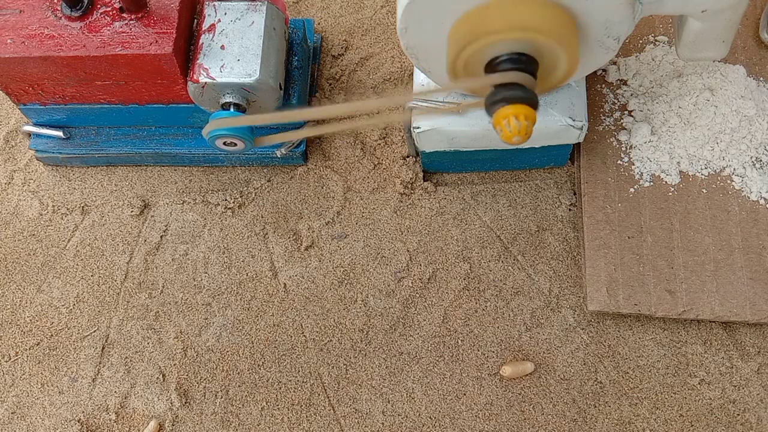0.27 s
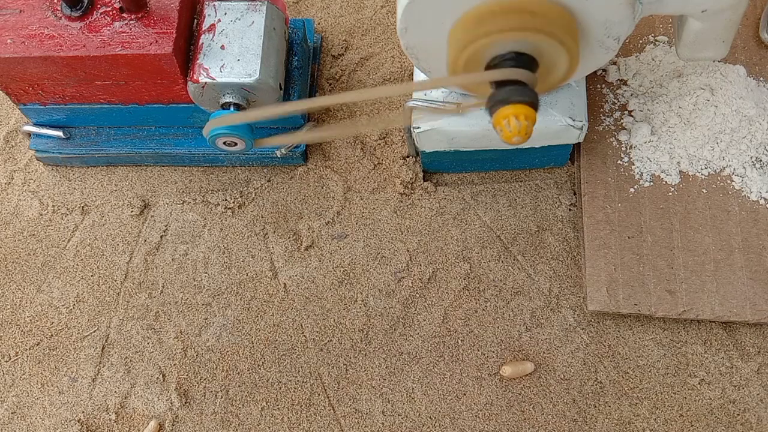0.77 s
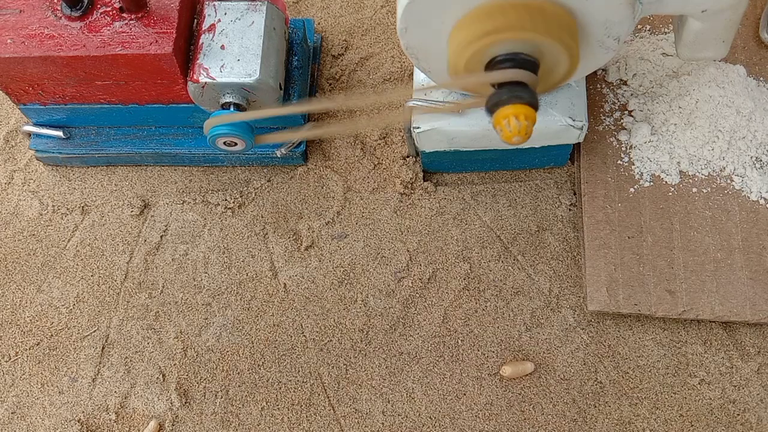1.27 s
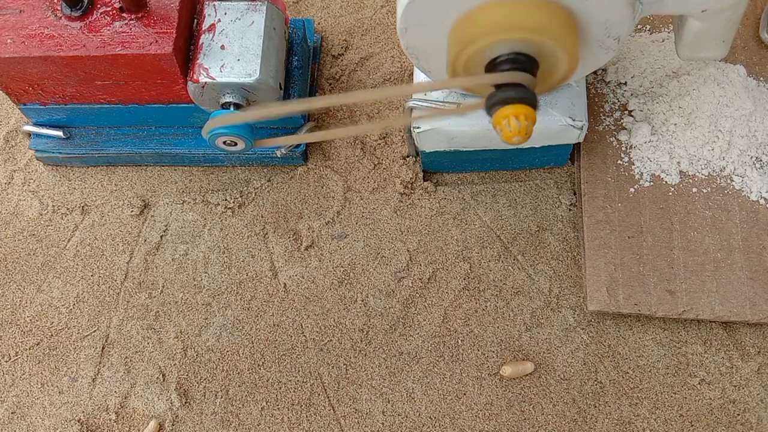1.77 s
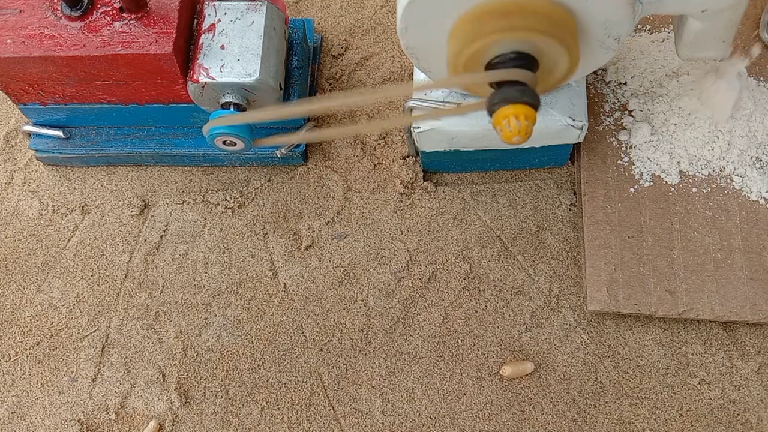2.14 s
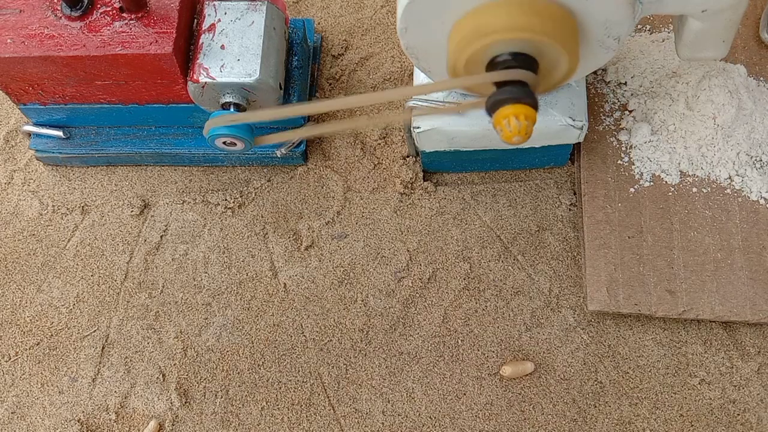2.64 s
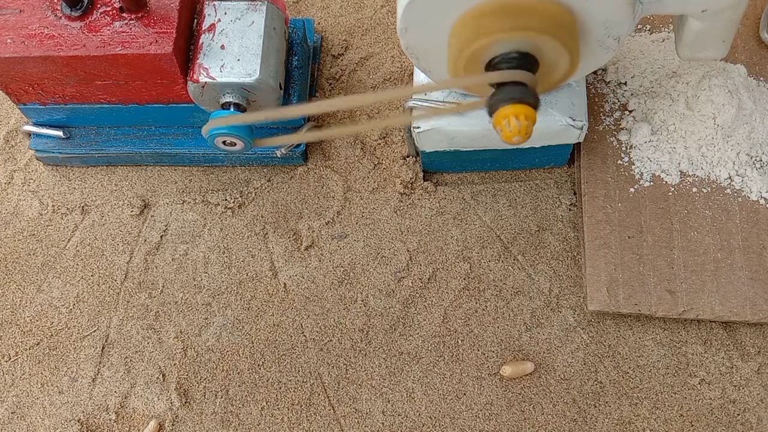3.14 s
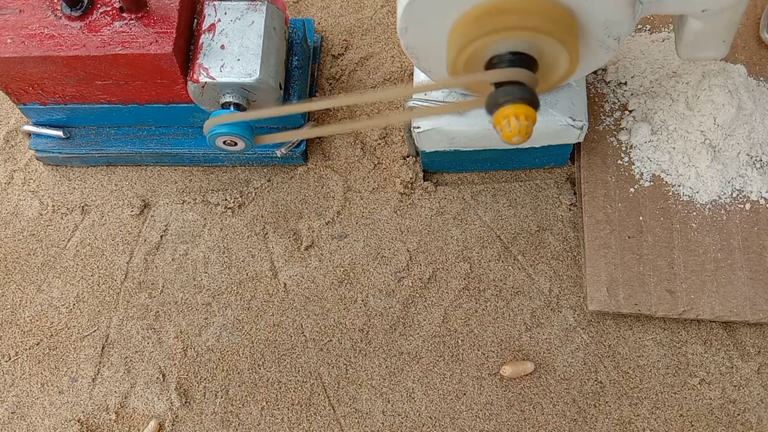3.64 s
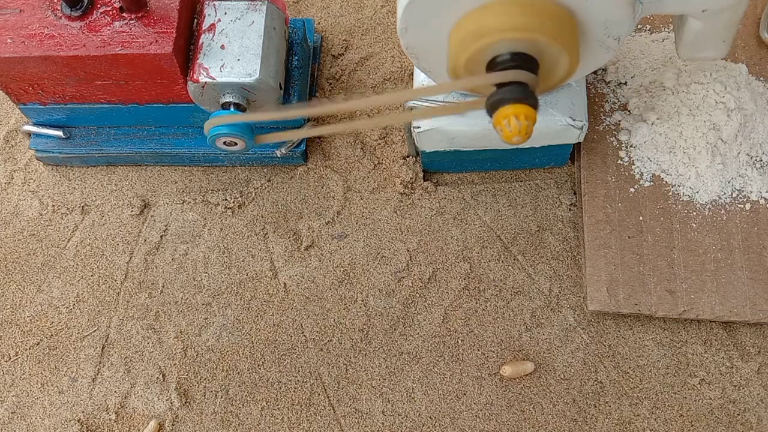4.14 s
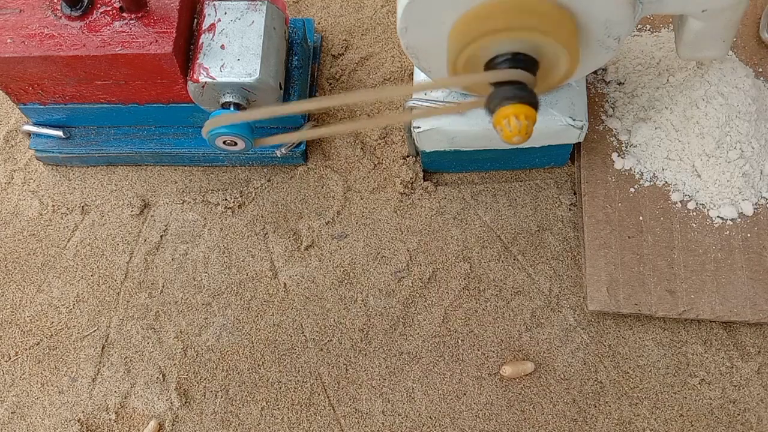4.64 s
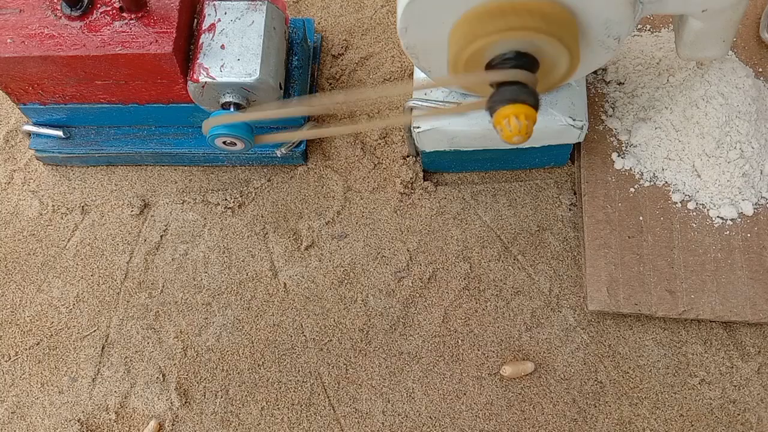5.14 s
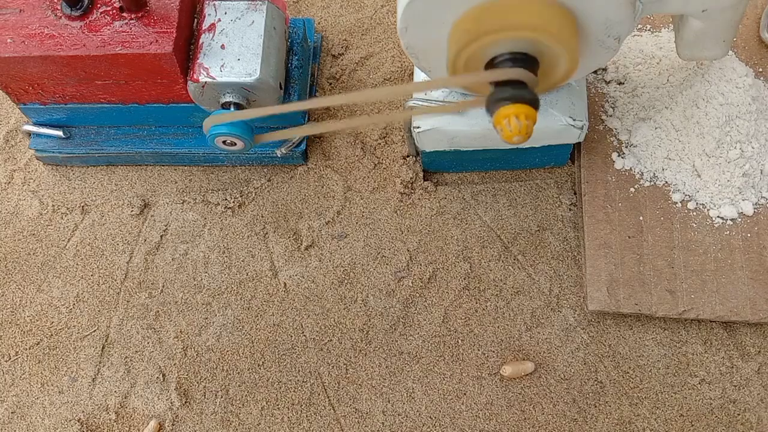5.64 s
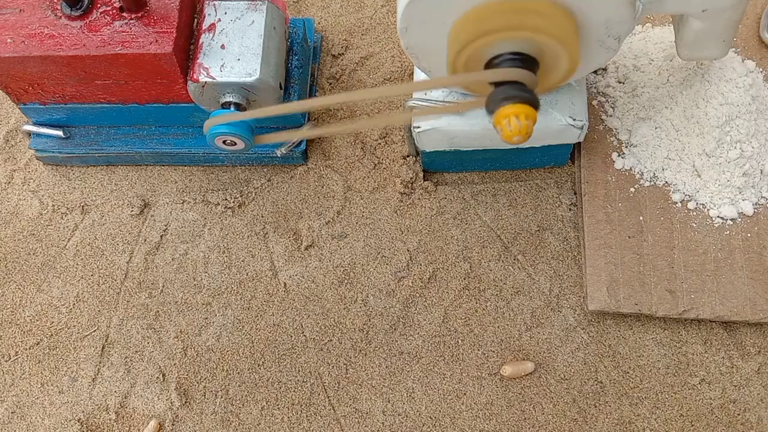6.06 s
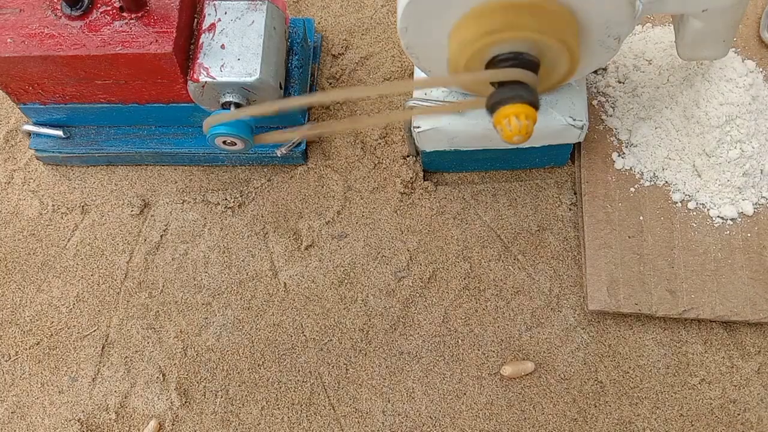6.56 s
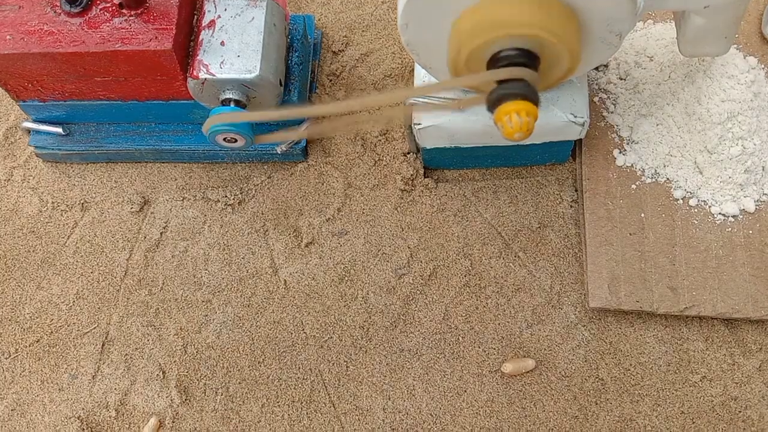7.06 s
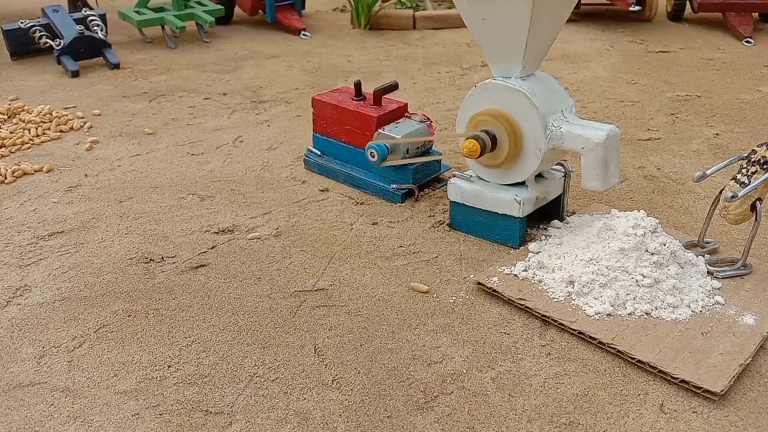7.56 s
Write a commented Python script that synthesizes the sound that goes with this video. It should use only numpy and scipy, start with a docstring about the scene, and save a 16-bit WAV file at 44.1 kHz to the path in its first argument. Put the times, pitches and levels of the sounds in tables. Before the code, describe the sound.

Knocking and rattling, a one-cylinder diesel engine at a miniature mill speeds up in three repeated surges, each ending in hissing exhaust barks.

```python
"""The looped sound of a single-cylinder diesel engine climbs evenly from 6 to 12.5 firings a second,
then coasts as the fuel is cut back. Each firing is an impulse that excites the block's modes; a fifth
of a cycle later the cylinder blows down through the resonant exhaust with a bark and a hiss, over
rattling metal. The same surge comes round again and again, each time with two faint hoots, and a
limiter holds the peaks."""
import sys
import numpy as np
from scipy import signal
from scipy.fft import rfft, irfft
from scipy.io import wavfile
from scipy.ndimage import uniform_filter1d, minimum_filter1d

SR = 44100
rng = np.random.default_rng(int(sys.argv[2]) if len(sys.argv) > 2 else 0)


def transcribe(u):
    """Save the signal u as a 16-bit wav file named by the first command-line argument.

    u: samples, shape (n,) or (channels, n), limited to [-1, 1]; the rate is SR.
    q: integer samples, one column per channel.
    """
    v = np.clip(np.atleast_2d(u).T, -1, 1)
    q = np.round(v * 32767).astype(np.int16)
    wavfile.write(sys.argv[1], SR, q)


N = 343980
SURGE_FROM_S, SURGE_TO_S = 2.655, 5.349
T = np.arange(int(SURGE_TO_S * SR)) / SR
FIRST_FIRING_S, START_HZ, CLIMB_HZ_PER_S, GOVERNED_HZ = 2.671, 6.0324, 3.11, 12.528

# spectral envelope common to the engine's noises: frequency_hz, relative_db
ENGINE_SPECTRUM = [(40, -36.5), (160, -32.5), (220, -19), (470, -18), (760, -15.5), (960, -4), (2200, -1),
                   (3300, -2.5), (3700, -13.5), (4800, -3.5), (7000, -13), (8000, -28), (9800, -45.5),
                   (11300, -40), (13500, -61)]
# strength of the exhaust barks through the surge: time_s, relative_db
BARK_STRENGTH = [(2.7, -12), (3.3, -2.5), (4.05, -7), (4.7, -5), (5.12, 8), (5.26, -18.5)]


def undb(db):
    """Decibels to amplitude ratio."""
    return 10 ** (np.asarray(db) / 20)


def unit(x):
    """Normalisation to rms 1."""
    return x / np.sqrt(np.mean(x ** 2))


def curve(table, t):
    """Linear interpolation in a two-column table."""
    return np.interp(t, *np.array(table).T)


def add(out, start_s, sound):
    """Superposition: mix a sound in at its start time."""
    i = int(round(start_s * SR))
    first, last = max(i, 0), min(i + len(sound), len(out))
    out[first:last] += sound[first - i:last - i]


def white():
    """Gaussian noise with a flat spectrum."""
    return rng.standard_normal(len(T))


def band(x, hz, width_hz):
    """Second-order resonance, gain 1 at its centre."""
    return signal.lfilter(*signal.iirpeak(hz, hz / width_hz, fs=SR), x)


def colour(x, *spectra, size=2048):
    """Minimum-phase filter of unit power; spectra in cascade add in decibels."""
    log_hz = np.log(np.maximum(np.arange(size // 2 + 1) * SR / size, 1))
    db = sum(np.interp(log_hz, np.log(p[:, 0]), p[:, 1]) for p in map(np.array, spectra))
    cepstrum = irfft(np.log(undb(db)))
    cepstrum[1:size // 2] *= 2  # folding the cepstrum makes the response causal
    cepstrum[size // 2 + 1:] = 0
    response = irfft(np.exp(rfft(cepstrum)))
    return signal.fftconvolve(x, response / np.linalg.norm(response))[:len(x)]


def firing_hz(t):
    """Uniform acceleration: the firing rate climbs until the governor holds it."""
    return np.minimum(START_HZ + CLIMB_HZ_PER_S * (t - FIRST_FIRING_S), GOVERNED_HZ)


def cycles():
    """Phase as the integral of rate: engine cycles since the first firing."""
    turned = np.cumsum(firing_hz(np.maximum(T, SURGE_FROM_S))) / SR
    return turned - np.interp(FIRST_FIRING_S, T, turned)


def cycle_times(phase):
    """Phase locking: the times at which each cycle reaches the given share of its length."""
    turned = cycles()
    return np.interp(np.arange(phase, turned[-1]), turned, T)


def fuel(t):
    """Energy supply, from shut (0) to full (1): opened, eased as speed rises, then cut back."""
    # fuel setting: time_s, share_of_full
    setting = [(2.66, 0.94), (2.82, 1), (3.98, 0.92), (4.3, 0.92), (4.65, 0.86), (4.85, 0.34), (5.3, 0.02)]
    return np.clip(curve(setting, t), 0, 1)


def engine_db(t, start_db, db_per_hz, shut_db):
    """Level law: linear in decibels with the rise in firing rate and the share of fuel shut off."""
    return start_db + db_per_hz * (firing_hz(t) - START_HZ) + shut_db * (1 - fuel(t))


def rumble(level_db=-74, hz=55, width_hz=45):
    """Narrow-band noise makes a very faint, low background."""
    return undb(level_db) * unit(band(band(white(), hz, width_hz), hz, width_hz))


def hoots(level_db=-38.5, fade_db_per_s=-20):
    """Two faint, nearly pure tones bend a little in pitch and decay exponentially."""
    # soft hoots: start_s, length_s, first_hz, middle_hz, last_hz
    notes = [(4.96, .26, 337, 348, 343), (5.428, .072, 372, 347, 340)]
    out = np.zeros(N)
    for start_s, length_s, *pitch_hz in notes:
        progress = np.linspace(0, 1, int(length_s * SR))
        hz = np.interp(progress, [0, .5, 1], pitch_hz)
        tone = np.sin(2 * np.pi * np.cumsum(hz) / SR)
        tapered = unit(signal.windows.tukey(len(tone), .2) * tone)
        add(out, start_s, tapered * undb(fade_db_per_s * length_s * progress))
    return undb(level_db) * out


def exhaust_pipe(x):
    """Air-column resonance: the pipe reinforces noise near its own modes."""
    # pipe resonances: centre_hz, width_hz, gain_db
    modes = [(490, 38, -2.5), (588, 70, 9), (810, 51, -14), (1050, 17, -11), (2220, 45, -12),
             (3045, 25, -26.5), (3170, 52, -18), (4420, 170, -12.5), (4430, 57, -24)]
    return x + sum(undb(db) * band(x, hz, width_hz) for hz, width_hz, db in modes)


def rattle(width_hz, spread_db, rush_db, modes=140, hits=260):
    """Random impact excitation: metal modes, each struck at its own moments, over a rush of gas."""
    metal = np.zeros(len(T))
    for hz in np.linspace(800, 15000, modes) + rng.uniform(-40, 40, modes):
        strikes = np.zeros(len(T))
        forces = undb(spread_db * np.clip(rng.standard_normal(hits), -2, 2))
        strikes[rng.integers(0, len(T), hits)] = forces
        metal += band(strikes, hz, width_hz)
    return unit(unit(metal) + undb(rush_db) * white())


def rattle_and_hiss(valve_phase, split_hz=3750, metal_depth=.28, gas_depth=0.93):
    """Amplitude modulation: metal and gas noise peak on the exhaust stroke, dip on the power stroke."""
    # level swing from the valve's opening, before scaling by each depth: cycle_share, swing_db
    stroke = [(0, -6.5), (.1, 7.5), (.2, 5.5), (.4, 4), (.5, -3.5), (.76, 1.5), (.86, 4.5), (1, -14)]
    stroke_db = curve(stroke, (cycles() - valve_phase) % 1)
    stroke_db = uniform_filter1d(stroke_db, size=90)  # the swing is eased over about 2 ms, so the level has no sudden step as each cycle wraps round
    noise = exhaust_pipe(colour(rattle(width_hz=41, spread_db=5.0, rush_db=0.0), ENGINE_SPECTRUM))
    metal = signal.sosfilt(signal.butter(4, split_hz, "low", fs=SR, output="sos"), noise)
    gas = signal.sosfilt(signal.butter(4, split_hz, "high", fs=SR, output="sos"), noise)
    metal_db = engine_db(T, start_db=-24.5, db_per_hz=0.92, shut_db=-4) + metal_depth * stroke_db
    gas_db = engine_db(T, start_db=-35.5, db_per_hz=2.05, shut_db=-16) + gas_depth * stroke_db
    return unit(metal) * undb(metal_db) + unit(gas) * undb(gas_db)


def gulps(valve_phase, delay_s=0.032, half_width_s=0.012, pipe_hz=540, width_hz=200, follow=0.34):
    """Pipe resonance: gas swings back with a hollow note, most after strong barks with the fuel cut."""
    swell = np.zeros(len(T))
    for open_s in cycle_times(valve_phase):
        strength = undb(follow * curve(BARK_STRENGTH, open_s))
        swell += strength * np.exp(-((T - open_s - delay_s) / half_width_s) ** 2)
    hollow = band(band(white(), pipe_hz, width_hz), pipe_hz, width_hz)
    return unit(hollow) * swell * undb(engine_db(T, start_db=-54, db_per_hz=2.1, shut_db=9.8))


def thumps(pitch_hz=95, decay_s=0.0038, size=3000):
    """Heavily damped oscillation: each firing shoves the engine, and unburnt fuel pops in the pipe."""
    # exhaust pops as the fuel is cut: start_s, level_db
    pops = [(4.754, -41), (4.905, -33), (4.987, -33)]
    t = T[:size]
    swing = np.sin(2 * np.pi * pitch_hz * t) * np.exp(-t / decay_s)
    firings = [(s, engine_db(s, start_db=-35, db_per_hz=-0.98, shut_db=-60)) for s in cycle_times(0)]
    out = np.zeros(len(T))
    for start_s, level_db in firings + list(pops):
        add(out, start_s, undb(level_db) * swing / swing.max())
    return out


def barks(valve_phase, rise_s=0.00092, close_s=0.0039, empty_s=0.14, full_s=.018, shut_s=0.0037,
          bark_db=-6, flutter_db=3, scatter_db=0.8, clink_db=-16, clink_hz=4320, size=4000):
    """Blowdown: the valve opens and cylinder pressure escapes in a burst that shakes the silencer."""
    # barks that stand out or ring brightly: near_s, extra_level_db, extra_ring_db
    accents = [(3.011, -1, 7.5), (3.275, 0.5, 9), (3.518, 6, 7), (4.754, 3, 3), (4.987, -7, 16)]
    t = T[:size]
    flow, ringing = np.zeros((2, len(T)))
    opens_s = cycle_times(valve_phase)
    levels_db = curve(BARK_STRENGTH, opens_s) + scatter_db * rng.standard_normal(len(opens_s))
    rings_db = np.zeros(len(opens_s))
    for near_s, extra_db, ring_db in accents:
        nearest = np.argmin(np.abs(opens_s - near_s))
        levels_db[nearest] += extra_db
        rings_db[nearest] = ring_db
    attack = 1 - np.exp(-(t / rise_s) ** 2)
    for open_s, level_db, ring_db in zip(opens_s, levels_db, rings_db):
        length_s = shut_s + (full_s - shut_s) * fuel(open_s)  # less fuel, shorter burst
        closing = np.exp(-np.maximum(t - length_s, 0) / close_s)
        puff = undb(level_db) * attack * closing * np.exp(-t / empty_s)
        add(flow, open_s, puff)
        add(ringing, open_s, undb(ring_db) * puff)
    flutter = undb(flutter_db * unit(band(white(), hz=218, width_hz=175)))
    burst = flow * unit(flutter) * rattle(width_hz=23, spread_db=4.0, rush_db=-1.5)
    # the bark's tilt on the engine spectrum: frequency_hz, relative_db
    tilt = [(150, -6.5), (1100, 2), (2800, 2), (7000, -4.5), (9000, 3), (15000, -2.5)]
    exhaust = exhaust_pipe(colour(burst, ENGINE_SPECTRUM, tilt))
    valve_clink = undb(clink_db) * ringing * unit(band(white(), clink_hz, width_hz=110))
    return undb(bark_db) * (exhaust + band(valve_clink, clink_hz, width_hz=600))


def knocks(rise_s=0.0023, crack_s=0.0058, crack_db=-3, tail_s=0.012, tail_db=-14,
           slap_s=0.0061, slap_half_width_s=0.0013, slap_db=-5, ring_db=-9, size=6000):
    """Impulse excitation: combustion sets the block ringing with a crack; the piston slaps just after."""
    # modes of the engine block: pitch_hz, relative_db, t60_s
    block_modes = [(486, -20.5, 0.072), (887, 0.5, 0.039), (1071, 0.5, 0.067), (1174, 5.5, 0.02),
                   (1280, 18, 0.013), (1480, -5, 0.057), (1850, 9, 0.035), (2134, -7.5, 0.086),
                   (2130, -5, 0.033)]
    # the crack's tilt on the engine spectrum: frequency_hz, relative_db
    tilt = [(60, 9), (170, -3.5), (260, 0), (700, 4), (1200, 5.5), (2200, 11), (2700, 0), (4500, -3),
            (6000, -41), (12000, 1)]
    t = T[:size]
    cracks, rings = np.zeros((2, len(T)))
    attack = 1 - np.exp(-(t / rise_s) ** 2)
    slap = undb(slap_db) * np.exp(-((t - slap_s) / slap_half_width_s) ** 2)
    envelope = attack * (np.exp(-t / crack_s) + slap + undb(tail_db) * np.exp(-t / tail_s))
    hz, mode_db, t60_s = np.array(block_modes).T[:, :, None]
    for firing_s in cycle_times(0):
        strength = undb(engine_db(firing_s, start_db=4.23, db_per_hz=-1.23, shut_db=-9))
        add(cracks, firing_s, strength * envelope * rng.standard_normal(size))
        detune, force, phase = rng.standard_normal((3, len(block_modes), 1))
        waves = np.sin(2 * np.pi * hz * (1 + 0.0073 * detune) * t + np.pi * phase)
        modes = undb(mode_db + 2 * force) * np.exp(-np.log(1000) * t / t60_s) * waves
        add(rings, firing_s, strength * attack * modes.sum(axis=0))
    return undb(crack_db) * colour(cracks, ENGINE_SPECTRUM, tilt) + undb(ring_db) * rings


def scene():
    """Superposition: the engine's parts sum to one surge, looped with slightly overlapping ends."""
    # time shift of each pass of the surge and its hoots: offset_s
    offsets = [-5.2234, -2.6875, 0, 2.6094]
    valve_phase = .208  # the exhaust valve opens this share of a cycle after each firing
    engine = knocks() + thumps() + barks(valve_phase) + gulps(valve_phase) + rattle_and_hiss(valve_phase)
    surge = (engine + rumble())[int(SURGE_FROM_S * SR):]
    surge *= signal.windows.tukey(len(surge), .005)
    out = np.zeros(N)
    for offset_s in offsets:
        add(out, SURGE_FROM_S + offset_s, surge)
        add(out, offset_s, hoots())
    return out[None]


def record(dry, ceiling=0.76, size=100, cutoff_hz=15400):
    """Peak limiting: a fast, smooth gain turns down the tallest peaks; a low-pass cuts the top."""
    needed = np.minimum(ceiling / (np.abs(dry) + 1e-9), 1)
    held = minimum_filter1d(needed, 2 * size)
    gain = uniform_filter1d(uniform_filter1d(held, size), size)
    return signal.sosfilt(signal.ellip(8, .2, 70, cutoff_hz, fs=SR, output="sos"), dry * gain)


dry = scene()
out = record(dry)
transcribe(out)
```